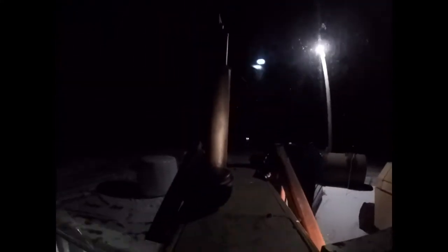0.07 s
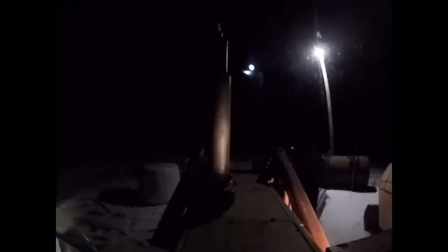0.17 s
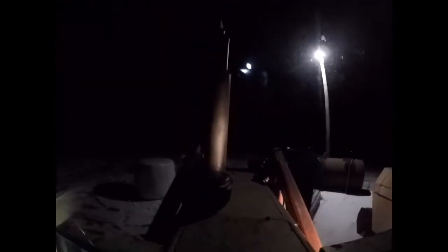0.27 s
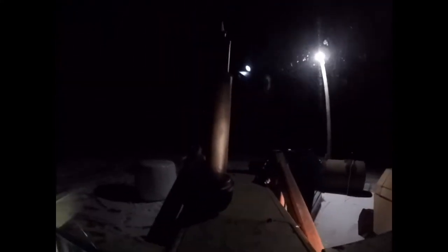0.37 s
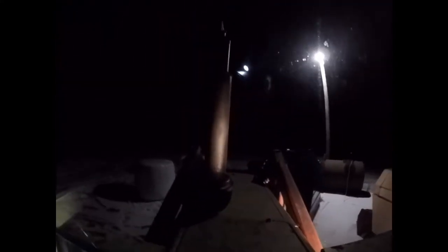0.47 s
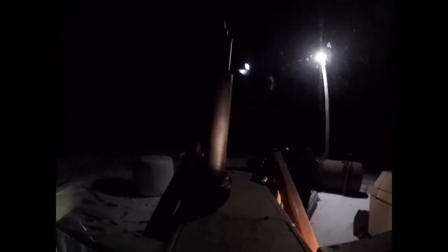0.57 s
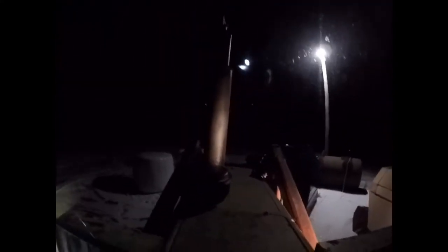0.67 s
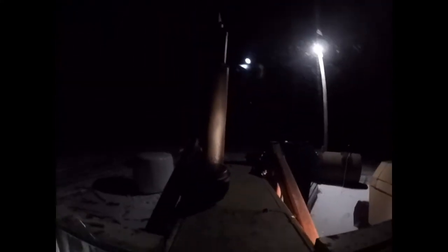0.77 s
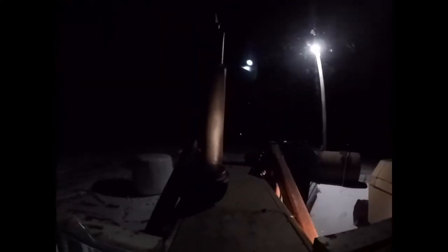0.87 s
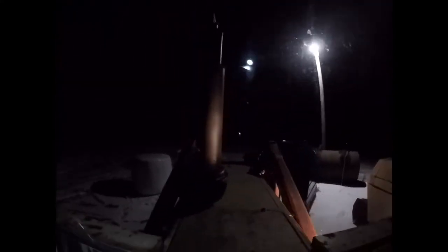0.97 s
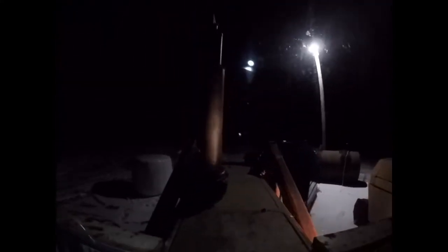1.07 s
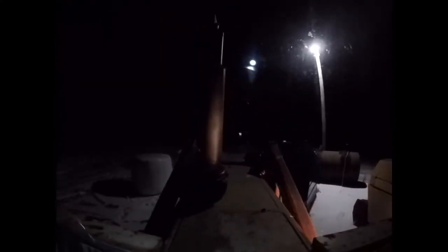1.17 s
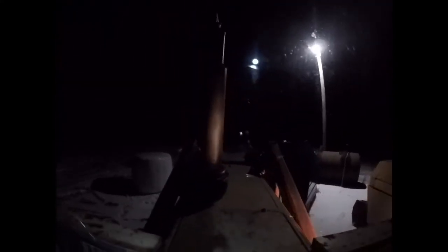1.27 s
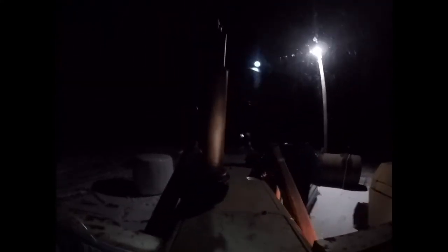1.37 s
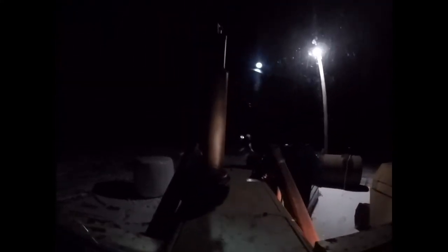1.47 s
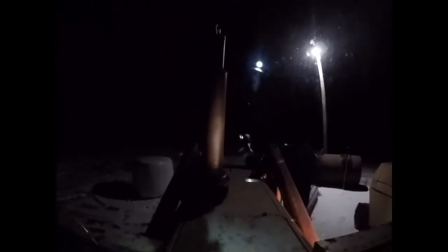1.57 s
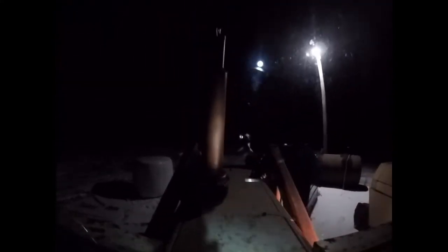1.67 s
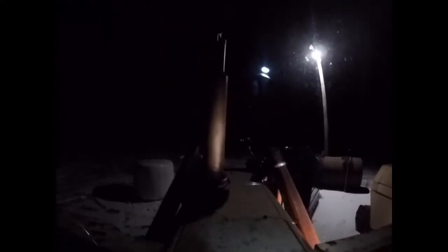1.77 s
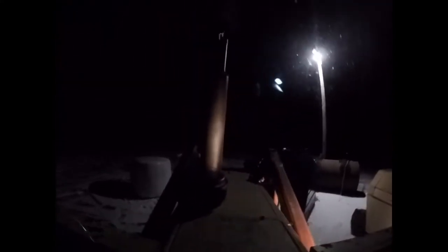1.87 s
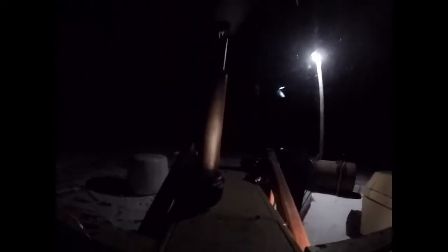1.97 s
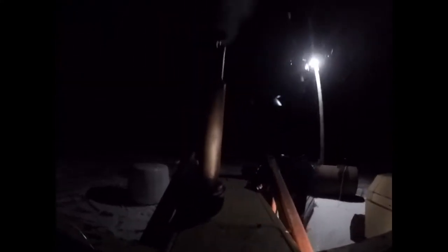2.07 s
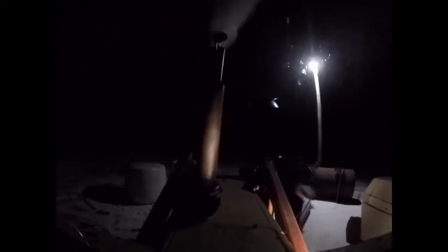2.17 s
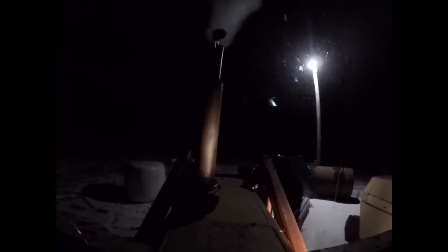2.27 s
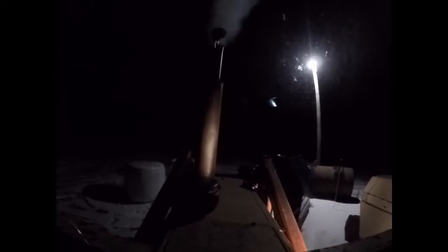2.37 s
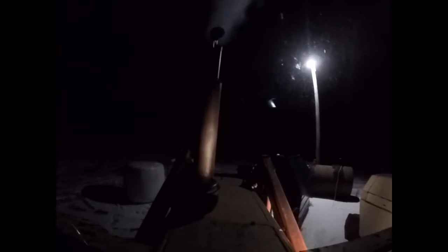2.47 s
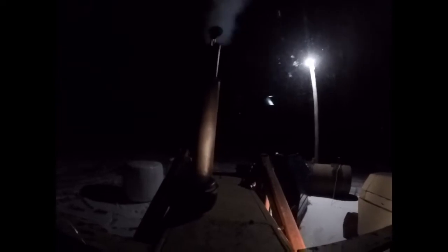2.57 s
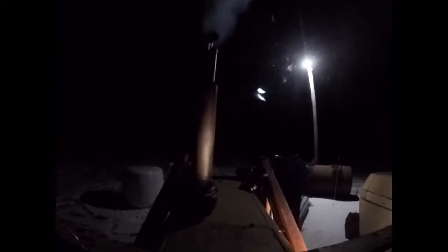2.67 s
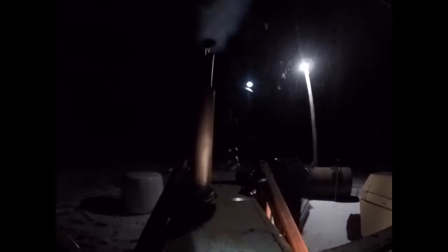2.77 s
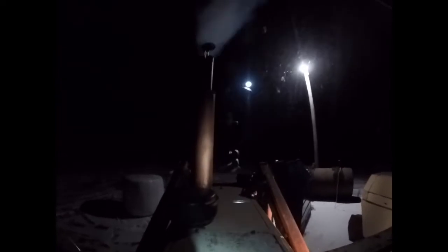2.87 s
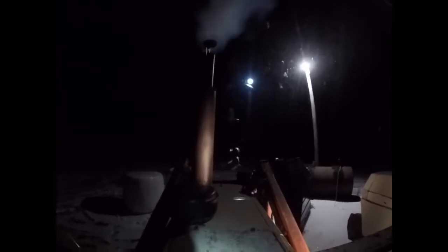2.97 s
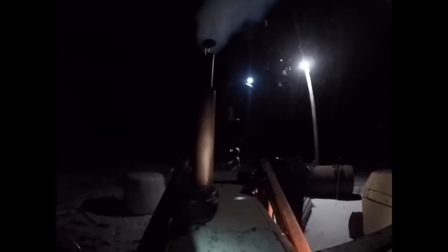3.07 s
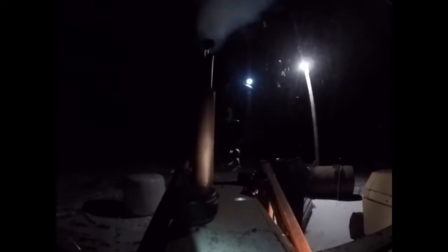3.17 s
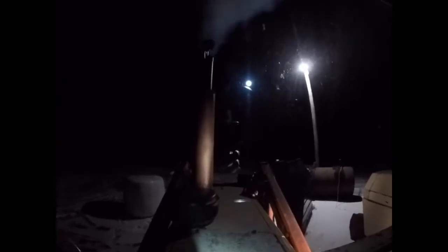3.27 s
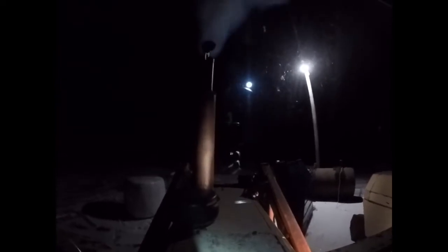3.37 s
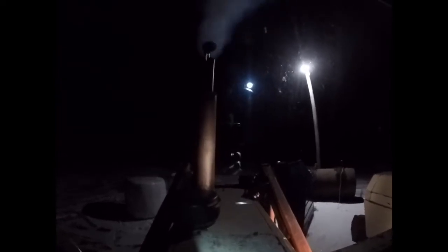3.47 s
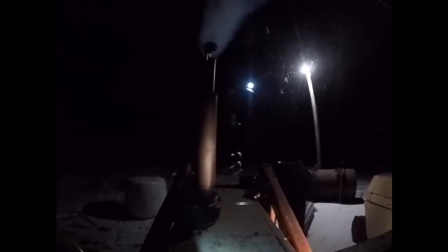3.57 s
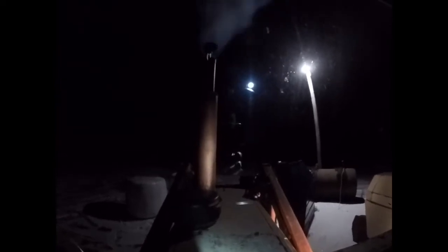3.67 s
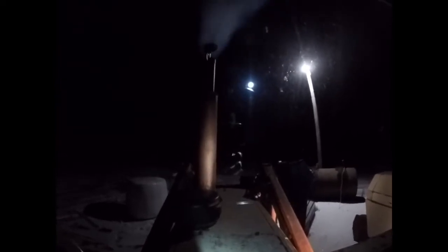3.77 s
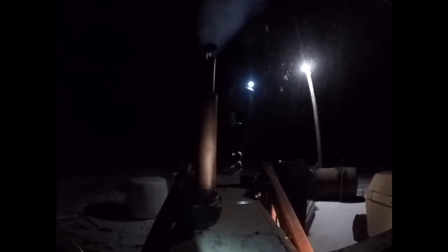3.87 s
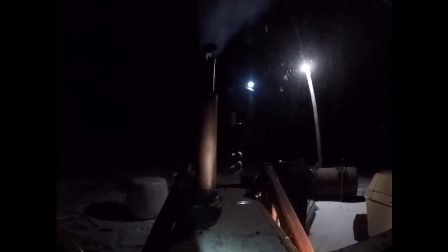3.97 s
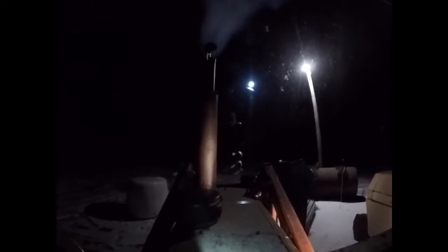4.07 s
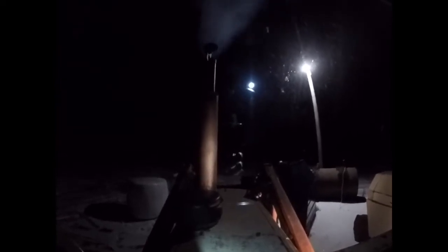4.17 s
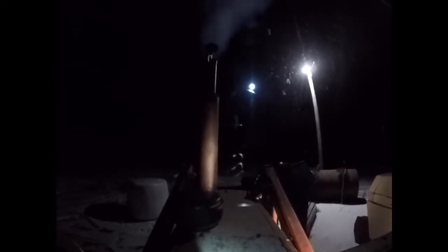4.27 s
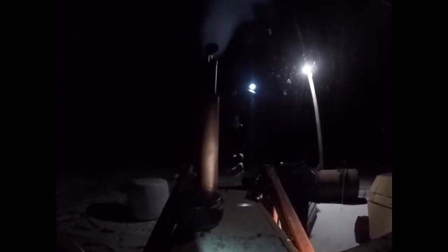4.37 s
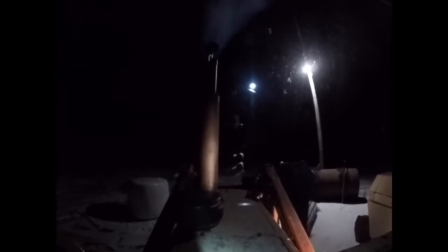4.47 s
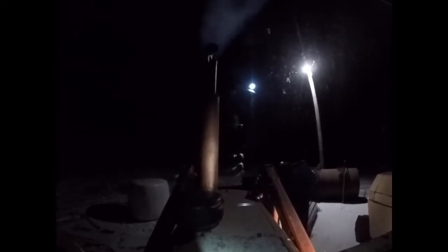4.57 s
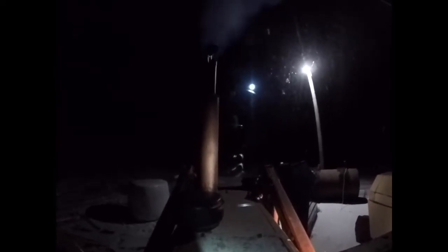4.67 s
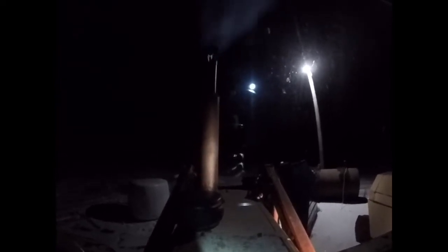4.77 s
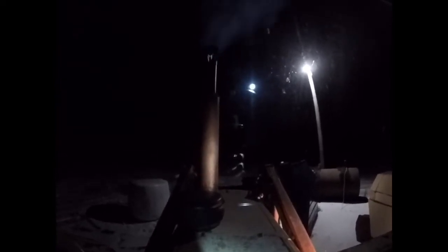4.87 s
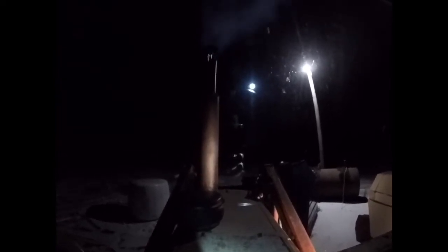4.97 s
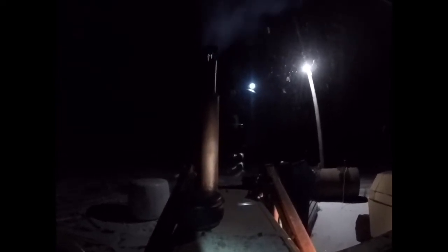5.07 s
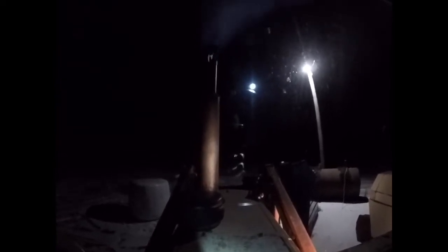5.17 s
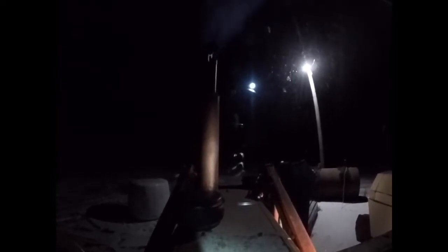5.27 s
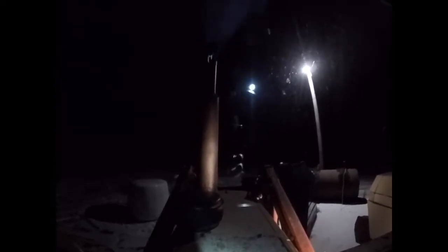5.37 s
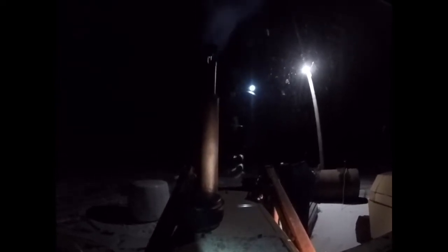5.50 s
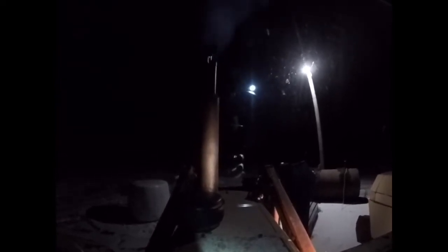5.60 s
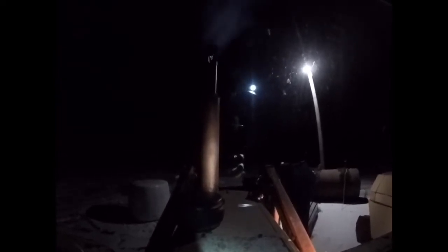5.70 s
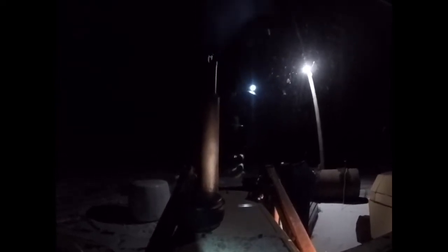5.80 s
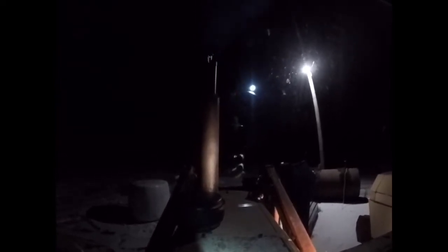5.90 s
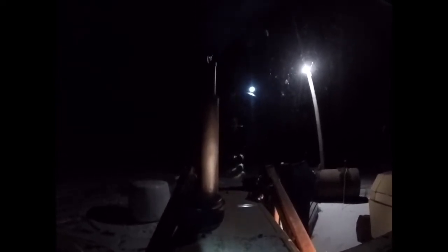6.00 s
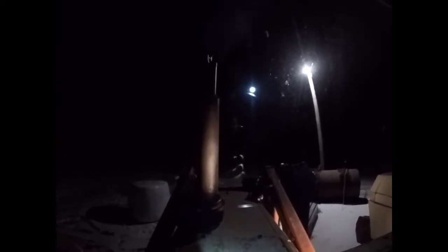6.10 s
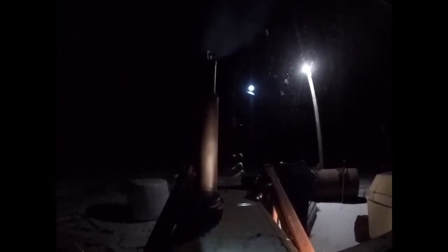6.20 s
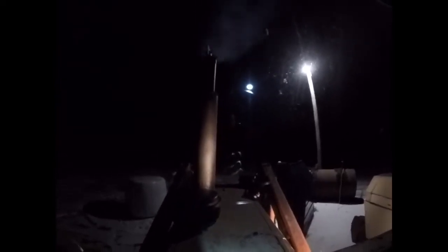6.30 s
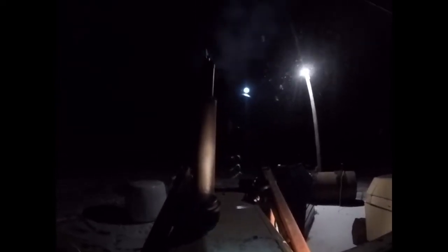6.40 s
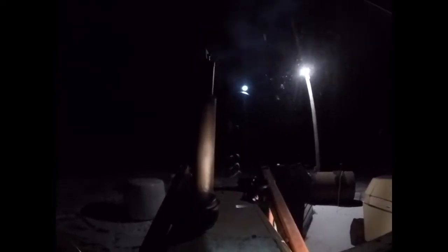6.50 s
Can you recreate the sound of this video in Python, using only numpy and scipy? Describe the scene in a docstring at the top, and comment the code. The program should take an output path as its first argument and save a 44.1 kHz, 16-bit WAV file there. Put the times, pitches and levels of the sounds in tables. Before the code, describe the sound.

Close microphone at the tractor seat in still open air. Faint handling thuds give way to a gritty starter whir and gear scrape under half a second long. The cold engine fires at once, loud and clattery, then settles into steady hard diesel knock, throaty stack roar, valve hiss and a thin turbo whistle. In the last half second pitch and loudness drop.

```python
"""Outdoors at night, from the driver's seat: a cold six-cylinder diesel tractor is started.
Fumbling at the controls: short filtered-noise bumps. Starter: swept gear partials, hum, grinding and rasps.
The engine catches at once and runs up to a fast idle: noise blows timed by the crankshaft ring stack and block.
Engine-order tones drone below, with gear mesh and a turbo whistle; near the end the throttle is eased."""
import sys
import numpy as np
from scipy import signal
from scipy.fft import rfft, irfft
from scipy.io import wavfile

SR = 44100
rng = np.random.default_rng(int(sys.argv[2]) if len(sys.argv) > 2 else 0)


def digitize_waveform(pressure):
    """Quantize a signal to 16-bit integers and store it at the path in sys.argv[1].

    Rows of a 2-D input are taken as channels; values are limited to [-1, 1].
    """
    field = np.atleast_2d(pressure).T
    bounded = np.clip(field, -1, 1)
    quanta = np.round(bounded * 32767).astype(np.int16)
    wavfile.write(sys.argv[1], SR, quanta)


N = 288414
TIME = np.arange(N) / SR  # [s]

# crankshaft speed: (time [s], speed [rev/min])
SPEED_RPM = [(1.2, 328.7), (1.6, 646.4), (1.9, 1073.5), (2.1, 1246.0), (2.45, 1333.3), (2.9, 1318.5),
             (3.1, 1338.2), (4.3, 1365.1), (5.93, 1367.7), (6.25, 1081.0), (6.54, 850.8)]
# fuel: full at the catch, governor cut, slow fall as the oil thins, hand easing; all scheduled
CATCH_S, CATCH_RISE_S = 1.348, 0.031
GOVERN_S, GOVERN_TAKES_S, GOVERN_DB = 1.64, 0.81, -2.5
THINNING_DB_PER_S = -0.43
EASE_S, EASE_TAKES_S, EASE_DB = 5.9, 0.15, -6
FUEL_SWELL_S, FUEL_SWELL_WIDTH_S, FUEL_SWELL_DB = 2.82, 0.12, 1.5
# the thin stack warms sooner than the block
STACK_WARM_S, STACK_WARM_TAKES_S = 2.52, 0.66
BLOCK_WARM_S, BLOCK_WARM_TAKES_S = 3.73, 1.27

# exhaust puffs: (time [s], level [dB])
EXHAUST_DB = [(1.33, -15), (1.68, -12.3), (2.0, -15), (3.0, -15.5), (3.4, -14.5), (4.2, -12.5), (5.0, -15),
              (6.2, -15), (6.54, -19)]
# exhaust stack colour: (frequency [Hz], relative level [dB])
STACK_COLOUR = [(15, -40), (30, -18.5), (55, -14), (95, -17), (125, -5.5), (200, -2.5), (255, -9),
                (330, -9.5), (400, -18), (600, -23.5), (1500, -49), (5000, -87)]
# stack resonances, cold: (centre [Hz], width [Hz], lift over colour [dB])
COLD_STACK_MODES = [(35, 63, 12), (141, 16, 8), (189, 78, -2.5), (281.4, 26, 7.5), (327, 23, 5)]
# stack resonances, warm: (centre [Hz], width [Hz], lift over colour [dB])
WARM_STACK_MODES = [(142.7, 12, 8.5), (177.6, 4.4, 12), (220, 37, 2), (292, 9.9, 2.2), (308, 87, 3.2)]

# cylinders in firing order: (combustion knock [relative dB], piston slap [relative dB])
CYLINDERS = [(2, 1.8), (1.6, 1.8), (1, .6), (1, -.2), (-2.1, -2.3), (-2.6, -2.3)]
# engine block colour: (frequency [Hz], relative level [dB])
BLOCK_COLOUR = [(150, -19), (300, -12), (450, 2), (700, -0.5), (1000, -3.5), (1300, -0.5), (1550, -7),
                (2000, -15), (2700, -20.5), (3500, -43), (6000, -38), (9000, -49.5), (15000, -76.5)]
# block resonances, cold: (centre [Hz], width [Hz], lift over colour [dB])
COLD_BLOCK_MODES = [(280, 25, 5.6), (575.5, 28, 17.1), (683, 42, 5.9), (801.6, 12, 12.5), (895, 167, 10.8),
                    (958, 53, 6.6), (1137, 136, 10.7), (1410, 430, 0.59), (1900, 450, 4.9)]
# block resonances, warm: (centre [Hz], width [Hz], lift over colour [dB])
WARM_BLOCK_MODES = [(550, 70, 12.9), (726, 15, 15), (803, 52, 11.2), (866, 49, 21.3), (1120, 27, 5.3),
                    (1738, 87, 11.6)]
KNOCK_DB, KNOCK_DB_PER_FUEL_DB = -15.5, 0.84
KNOCK_BRIGHT_HZ, KNOCK_BRIGHT_DB_PER_FUEL_DB = 1600, 0.61  # more fuel hardens the knock
COLD_SHARE_START, COLD_SHARE_END = 0.75, 0.34  # share of the cold ring
LOPE_DB, LOPE_PHASE_CYCLES = 0.75, 0.13  # cold surge once a cycle

# resonances swept by the firing tone: (centre [Hz], width [Hz], level at full fuel [dB])
BOOMS = [(29.8, 12, -17), (48.3, 8.6, -11.5)]
# lines from unequal cylinders: (multiple of cycle rate, level at top speed before cold rocking [dB])
UNEVEN_ORDERS = [(2, -32), (3, -34), (4, -30), (5, -33), (6, -35), (7, -34), (8, -26), (10, -26), (11, -30),
                 (13, -28), (16, -28), (18, -30), (21, -37), (25, -35), (26, -33), (29, -31), (31, -34)]
COLD_ROCKING_DB = 10  # divided by the multiple of the cycle rate
# stack drone at the octave of the firing tone
DRONE_HZ, DRONE_WIDTH_HZ, DRONE_COLD_DB, DRONE_WARM_GAIN_DB = 131.2, 22, -17, 8
DRONE_DB_PER_FUEL_DB = 0.49

# valve, injector and rasp hiss colour: (frequency [Hz], relative level [dB])
HISS_COLOUR = [(600, -19.5), (1800, 8), (3000, 1), (3900, 1.5), (5000, -1.5), (6200, -1), (7500, -14.5),
               (8600, -13.5), (10000, -23), (11500, -36), (13200, -21), (15000, -35)]
HISS_DB, HISS_DB_PER_FUEL_DB = -36.5, 0.47
START_RUSH_DB = 3  # extra hiss, fading out over the governor cut
HISS_COAST_DB_PER_S = -1.5  # from the easing on

# timing gear: teeth per crankshaft revolution; block resonance it excites
GEAR_TEETH = 38
GEAR_HZ, GEAR_WIDTH_HZ, GEAR_COLD_DB, GEAR_WARM_GAIN_DB = 872, 50, -40, 14.5

# turbocharger: pitch is at top speed, at TURBO_S
TURBO_S, TURBO_RISE_S, TURBO_DB, TURBO_DB_PER_FUEL_DB = 4.3, .4, -52, 0.46
TURBO_HZ, TURBO_CREEP_HZ_PER_S, TURBO_SPEED_POWER = 5470, 190, .7

STARTER_ON_S, STARTER_OFF_S, STARTER_RISE_S, STARTER_FALL_S = .875, 1.158, 0.05, 0.08
WHINE_DB, HUM_DB, HUM_HZ, HUM_SAG_HZ_PER_S = -25, -25.5, 87.5, -42
# whine is loudest as compression slows the motor
WHINE_LOAD_S, WHINE_LOAD_WIDTH_S, WHINE_LOAD_DB = 1.138, 0.058, 5.5
# tooth rate under compression; extra rate in the spurt between two compressions
TOOTH_HZ, SPURT_HZ, SPURT_S, SPURT_WIDTH_S = 278.4, 67.04, 1.073, 0.048
# starter gear whine partials: (multiple of tooth rate, relative level [dB])
WHINE_ORDERS = [(1, -4), (2, -2), (3, 0), (4, -11), (5, -10), (6, -13), (7, -16), (8, -20), (9, -18),
                (10, -24)]
# pinion slides in, bites, cranks, grinds twice on its way out:
# (start [s], length before decay [s], shudder [dB], grinding [dB], rasp [dB])
GRINDS = [(0.833, 0.047, -50, -32.5, -41), (0.868, 0.019, -16.5, -23, -36), (0.906, 0.032, -14, -43, -49),
          (0.959, 0.21, -23.5, -26, -47), (1.214, 0.041, -19, -20, -38), (1.294, 0.034, -21.5, -23.5, -39)]
GRIND_RISE_S, GRIND_T60_S = 0.025, 0.3
# pinion grinding colour: (frequency [Hz], relative level [dB])
GRIND_COLOUR = [(200, -18), (450, -6), (600, -1.5), (750, -4), (900, 0), (1300, -5.5), (1600, -6.5),
                (2500, -13.5), (4000, -19), (8000, -36), (15000, -56)]
# gear-tooth rasps: (middle [s], level [dB], centre [Hz], width [Hz], spread in time [s])
RASPS = [(0.882, -40, 7300, 2930, 0.01), (0.878, -51, 12000, 1990, .008), (0.852, -47, 9800, 6000, 0.0092),
         (1.0, -36.5, 5860, 1600, 0.0092), (1.01, -30, 2470, 250, 0.015), (1.07, -37, 3150, 297, 0.03),
         (1.078, -38, 4340, 1780, 0.066), (1.145, -30, 6020, 1500, 0.011), (1.242, -32, 3200, 500, 0.012),
         (1.243, -34, 5660, 1900, 0.024), (1.247, -29, 1980, 500, 0.0097)]
# starter kick and first firings: (time [s], thump [dB], knock [dB], t60 [s])
JOLTS = [(.878, -13, -10.5, 0.14), (0.902, -9, -17, 0.27), (0.941, -14, -24, 0.13), (1.261, -7, -25, 0.1),
         (1.314, -11, -31, 0.15), (1.368, -29, -25, 0.12), (1.419, -7, -10, 0.1), (1.458, -18, -14, 0.11),
         (1.652, -5.5, -30, 0.2)]

# bumps and ticks at the controls: (time [s], level [dB], brightness [Hz], t60 [s])
TICKS = [(.0, -37, 490, 0.4), (.0, -30, 35.5, 0.76), (.044, -44.5, 1300, 0.17), (0.148, -43, 3500, 0.075),
         (.155, -37, 170, 0.25), (0.219, -30, 95, 0.18), (.254, -40.5, 1200, 0.085),
         (0.253, -28, 200, 0.088), (0.355, -42, 800, 0.13), (.356, -38, 220, 0.11), (.615, -35, 90, 0.089),
         (.685, -55, 6000, 0.25), (.72, -44, 600, 0.14), (.76, -56, 7950, 0.22)]
# still night air and handling rumble colour: (frequency [Hz], relative level [dB])
AIR_COLOUR = [(12, -23), (20, 7), (50, 5), (87, -4), (286, -7.5), (347, -14), (693, -20.5), (1390, -24.5),
              (5240, -36), (9110, -37), (12700, -45), (15000, -56.5)]
AIR_DB = -41.5
BAND_EDGE_HZ = 15100


def amp(db):
    """Decibels to gain."""
    return 10 ** (np.asarray(db) / 20)


def unit(x):
    """Scales to an rms of one."""
    return x / np.sqrt(np.mean(x ** 2) + 1e-20)


def curves(rows):
    """Each column of a table, joined by straight lines in time."""
    times_s, *columns = np.transpose(rows)
    return [np.interp(TIME, times_s, column) for column in columns]


def ramp(start_s, length_s):
    """Linear rise from zero at start_s to one, length_s later."""
    return np.clip((TIME - start_s) / length_s, 0, 1)


def bump(middle_s, width_s):
    """Gaussian swell that reaches one at middle_s."""
    return np.exp(-((TIME - middle_s) / width_s) ** 2 / 2)


def burst(start_s, t60_s):
    """Envelope with a fast rise at start_s, then exponential decay."""
    age_s = np.maximum(TIME - start_s, 0)
    return (1 - np.exp(-age_s / 0.0025)) * np.exp(-np.log(1000) * age_s / t60_s)


def add(mix, start_s, sound):
    """Mixes a sound in at start_s."""
    part = mix[max(0, round(start_s * SR)):][:len(sound)]
    part += sound[:len(part)]


def wander(hz):
    """Slow random curve of rms one, up to about hz."""
    f = np.fft.rfftfreq(N, 1 / SR)
    spectrum = rfft(rng.standard_normal(N))
    return unit(irfft(spectrum / (1 + (f / hz) ** 4), N))


def in_tune(hz, centre_hz, width_hz):
    """How strongly a tone excites a resonance: one at its centre."""
    return 1 / (1 + (2 * (hz - centre_hz) / width_hz) ** 2)


def colour(x, points, modes=(), size=16384):
    """Filters x through a body with a smooth colour and resonances; minimum phase, rms one."""
    hz = np.fft.rfftfreq(size, 1 / SR)
    point_hz, point_db = np.transpose(points)
    db = np.interp(np.log(hz + 1), np.log(point_hz), point_db)
    for centre_hz, width_hz, lift_db in modes:
        db = db + lift_db * in_tune(hz, centre_hz, width_hz)
    log_gain = np.r_[db, db[-2:0:-1]] * np.log(10) / 20
    # the Hilbert transform of the log gain gives the causal phase
    response = np.fft.ifft(np.exp(np.conj(signal.hilbert(log_gain)))).real[:size // 2]
    return unit(signal.oaconvolve(x, response)[:N])


def brighten(x, hz, db):
    """Raises or lowers the treble above hz by a curve of dB."""
    highpass = signal.butter(2, hz, "high", fs=SR, output="sos")
    return x + (amp(db) - 1) * signal.sosfiltfilt(highpass, x)


def blows(turn, levels_db, lag, decay, fresh, scatter_db, jitter_s, size=4096):
    """Evenly spaced blows over the cycle; each keeps its own rattle, partly renewed every time.
    lag and decay are fractions of a cycle, so a slow engine gives long blows."""
    count = len(levels_db)
    number = np.arange(int(turn[-1] * count))
    times_s = np.interp(number / count + lag, turn, TIME)
    periods_s = np.maximum(np.gradient(times_s), 1 / SR) * count
    own = rng.standard_normal((count, size))
    chance = rng.standard_normal((len(number), size + 2))
    fresh = np.clip(fresh, 0, 1)
    out = np.zeros(N)
    for k, time_s, period_s, z in zip(number, times_s, periods_s, chance):
        rattle = np.sqrt(1 - fresh) * own[k % count] + np.sqrt(fresh) * z[2:]
        dying = np.exp(-TIME[:size] / (decay * period_s))
        gain = amp(levels_db[k % count] + scatter_db * z[1])
        add(out, time_s + jitter_s * z[0], gain * dying * rattle)
    return out


def cycles():
    """Four-stroke cycles turned since the start of the speed table: two revolutions each."""
    cycle_hz = curves(SPEED_RPM)[0] / (2 * 60)
    return np.cumsum(cycle_hz * (TIME > SPEED_RPM[0][0])) / SR


def speed():
    """Crankshaft speed as a share of its top speed."""
    rpm = curves(SPEED_RPM)[0]
    return rpm / rpm.max()


def fuel():
    """Scheduled fuel per stroke, in dB relative to full."""
    governed_db = GOVERN_DB * ramp(GOVERN_S, GOVERN_TAKES_S)
    swell_db = FUEL_SWELL_DB * bump(FUEL_SWELL_S, FUEL_SWELL_WIDTH_S)
    thinning_db = THINNING_DB_PER_S * np.maximum(TIME - GOVERN_S, 0)
    return governed_db + swell_db + thinning_db + EASE_DB * ramp(EASE_S, EASE_TAKES_S)


def stack_warmth():
    """Stack state: zero cold, one warm."""
    return ramp(STACK_WARM_S, STACK_WARM_TAKES_S)


def block_warmth():
    """Block state: zero cold, one warm."""
    return ramp(BLOCK_WARM_S, BLOCK_WARM_TAKES_S)


def engine():
    """All the running parts, locked to the crankshaft, fading in as the cylinders catch."""
    turn, fuel_db = cycles(), fuel()
    fired = drone(turn, fuel_db) + exhaust(turn) + knock(turn, fuel_db) + valve_gear(turn, fuel_db)
    return ramp(CATCH_S, CATCH_RISE_S) * (fired + timing_gear(turn) + turbo(fuel_db))


def knock(turn, fuel_db):
    """Combustion and piston slap ring the block; as it warms, the ring shifts and firing evens out."""
    hits = blows(turn, np.ravel(CYLINDERS), lag=-.035, decay=.105, fresh=.3, scatter_db=.7, jitter_s=.00005)
    warm = block_warmth()
    cold_share = np.clip(COLD_SHARE_START + (COLD_SHARE_END - COLD_SHARE_START) * warm, 0, 1)
    cold_ring = colour(hits, BLOCK_COLOUR, COLD_BLOCK_MODES)
    warm_ring = colour(hits, BLOCK_COLOUR, WARM_BLOCK_MODES)
    ring = cold_share * cold_ring + (1 - cold_share) * warm_ring
    lope_db = LOPE_DB * (1 - warm) * np.cos(2 * np.pi * (turn - LOPE_PHASE_CYCLES))
    treble_db = KNOCK_BRIGHT_DB_PER_FUEL_DB * (fuel_db - np.median(fuel_db))
    level_db = KNOCK_DB + KNOCK_DB_PER_FUEL_DB * fuel_db + lope_db
    return amp(level_db) * brighten(ring, KNOCK_BRIGHT_HZ, treble_db)


def exhaust(turn):
    """Ragged puffs ring the stack, whose resonances shift as it warms."""
    puffs = blows(turn, np.zeros(len(CYLINDERS)), lag=0.0308, decay=0.11, fresh=0.88,
                  scatter_db=0.1, jitter_s=0.00034)
    warm = stack_warmth()
    cold_roar = colour(puffs, STACK_COLOUR, COLD_STACK_MODES)
    warm_roar = colour(puffs, STACK_COLOUR, WARM_STACK_MODES)
    return amp(curves(EXHAUST_DB)[0]) * ((1 - warm) * cold_roar + warm * warm_roar)


def drone(turn, fuel_db):
    """Clean engine orders: the firing tone and its octave swell at resonances, over uneven-cylinder lines."""
    firings = len(CYLINDERS) * turn
    firing_hz = np.gradient(firings) * SR
    boom = sum(amp(db + fuel_db) * in_tune(firing_hz, centre, width) for centre, width, db in BOOMS)
    octave_db = DRONE_COLD_DB + DRONE_DB_PER_FUEL_DB * fuel_db + DRONE_WARM_GAIN_DB * block_warmth()
    octave_db = octave_db + .6 * wander(2.5)
    octave = amp(octave_db) * in_tune(2 * firing_hz, DRONE_HZ, DRONE_WIDTH_HZ)
    rocking_db = COLD_ROCKING_DB * (1 - stack_warmth())
    lines = np.zeros(N)
    for order, db in UNEVEN_ORDERS:
        line_db = db + rocking_db / order + 0.97 * wander(3.1)
        lines += amp(line_db) * np.sin(2 * np.pi * (order * turn + rng.random()))
    shaking = speed() ** 2.8  # shaking forces grow with speed
    tones = boom * np.sin(2 * np.pi * firings) + octave * np.sin(2 * np.pi * 2 * firings)
    return np.sqrt(2) * (tones + shaking * lines)


def valve_gear(turn, fuel_db):
    """Valves and injectors tick over a rush that swells each revolution; eased, it also pulses each cycle."""
    eased = ramp(EASE_S, EASE_TAKES_S)
    hiss_db = HISS_DB + HISS_DB_PER_FUEL_DB * fuel_db
    hiss_db = hiss_db + START_RUSH_DB * (1 - ramp(GOVERN_S, GOVERN_TAKES_S))
    hiss_db = hiss_db + HISS_COAST_DB_PER_S * np.maximum(TIME - EASE_S, 0)
    ticks = blows(turn, np.zeros(2 * len(CYLINDERS)), lag=.05, decay=0.092, fresh=0.82,
                  scatter_db=1.0, jitter_s=0.00045)
    # ticks stand out more once eased
    rush = (2.1 - 0.27 * eased) * rng.standard_normal(N)
    hiss = colour((1 + .4 * eased) * unit(ticks) + rush, HISS_COLOUR)
    bright = brighten(hiss, 7000, 1.2 * (hiss_db - np.median(hiss_db)))
    revolution_db = 0.4 * np.cos(2 * np.pi * 2 * (turn - .26))
    cycle_db = 0.71 * eased * np.cos(2 * np.pi * (turn - .2))
    return amp(hiss_db + revolution_db + cycle_db + 0.88 * wander(32)) * bright


def timing_gear(turn):
    """Gear teeth on the crankshaft mesh harder once a cycle, and sing near the block's resonance."""
    teeth = 2 * GEAR_TEETH * turn
    load = 1 + 0.6 * np.cos(2 * np.pi * (turn - .25))
    tone = np.sin(2 * np.pi * teeth + 0.15 * wander(25))
    mesh = tone * in_tune(np.gradient(teeth) * SR, GEAR_HZ, GEAR_WIDTH_HZ)
    level_db = GEAR_COLD_DB + GEAR_WARM_GAIN_DB * block_warmth() + 1.2 * wander(45)
    return amp(level_db) * load * mesh


def turbo(fuel_db):
    """Thin, wavering whistle: pitch follows speed by a power law, level follows fuel."""
    hz = (TURBO_HZ + TURBO_CREEP_HZ_PER_S * (TIME - TURBO_S)) * speed() ** TURBO_SPEED_POWER
    whistle = np.sqrt(2) * np.sin(2 * np.pi * np.cumsum(hz * (1 + .007 * wander(90))) / SR)
    level_db = TURBO_DB + TURBO_DB_PER_FUEL_DB * fuel_db + 2.5 * wander(11)
    return ramp(TURBO_S, TURBO_RISE_S) * amp(level_db) * whistle


def starter():
    """The motor hums and its gear whines, spurting ahead between two compressions; the pinion grinds."""
    tooth_hz = TOOTH_HZ + SPURT_HZ * bump(SPURT_S, SPURT_WIDTH_S)
    teeth = np.cumsum(tooth_hz * (1 + .02 * wander(70))) / SR
    partials = np.zeros(N)
    for order, db in WHINE_ORDERS:
        partials += amp(db + 3 * wander(45)) * np.sin(2 * np.pi * (order * teeth + rng.random()))
    whine_db = WHINE_DB + WHINE_LOAD_DB * bump(WHINE_LOAD_S, WHINE_LOAD_WIDTH_S)
    hum_hz = HUM_HZ + HUM_SAG_HZ_PER_S * (TIME - STARTER_ON_S)
    hum = np.sqrt(2) * np.sin(2 * np.pi * np.cumsum(hum_hz) / SR)
    running = ramp(STARTER_ON_S, STARTER_RISE_S) * (1 - ramp(STARTER_OFF_S, STARTER_FALL_S))
    return running * (amp(whine_db) * unit(partials) + amp(HUM_DB) * hum) + grinding(teeth)


def grinding(teeth):
    """Each grind of the pinion on the ring gear shakes the frame and scrapes, tooth by tooth."""
    tooth_pulse = 0.98 + np.exp(-(teeth % 1) / 0.5)
    scrape = rng.standard_normal(N) * tooth_pulse * amp(0.8 * wander(90))
    shudder = colour(scrape, [(60, -9.5), (120, -7.5), (170, 7.5), (215, -4.0), (290, 2.5),
                              (420, -28.5), (1200, -70)])
    grind = colour(scrape, GRIND_COLOUR)
    rasp = colour(scrape, HISS_COLOUR)
    out = np.zeros(N)
    for start_s, length_s, shudder_db, grind_db, rasp_db in GRINDS:
        after_s = np.maximum(TIME - start_s - length_s, 0)
        held = ramp(start_s, GRIND_RISE_S) * np.exp(-np.log(1000) * after_s / GRIND_T60_S)
        out += held * (amp(shudder_db) * shudder + amp(grind_db) * grind + amp(rasp_db) * rasp)
    return out


def rasps():
    """The teeth scrape in short bright noise bursts as the load changes."""
    out = np.zeros(N)
    for middle_s, db, hz, width_hz, spread_s in RASPS:
        body = [(hz / 4, -25), (hz, 0), (hz * 2, -30)]
        band = colour(rng.standard_normal(N), body, [(hz, width_hz, 14)])
        out += amp(db) * bump(middle_s, spread_s) * band
    return out


def jolts():
    """Single heavy blows shake the stack and the cold block."""
    thump = colour(rng.standard_normal(N), [(50, -27), (130, 8.5), (200, -6.0), (300, 5),
                                            (420, -12), (1200, -69)])
    clank = colour(rng.standard_normal(N), BLOCK_COLOUR, COLD_BLOCK_MODES)
    out = np.zeros(N)
    for start_s, thump_db, knock_db, t60_s in JOLTS:
        out += burst(start_s, t60_s) * (amp(thump_db) * thump + amp(knock_db) * clank)
    return out


def cab():
    """Steady air and handling rumble; decaying noise bumps and ticks at the controls."""
    out = amp(AIR_DB) * colour(rng.standard_normal(N), AIR_COLOUR)
    for start_s, db, hz, t60_s in TICKS:
        body = [(hz / 5, -14), (hz, 0), (hz * 1.4, -4), (hz * 2.2, -18), (hz * 16, -70)]
        out += amp(db) * burst(start_s, t60_s) * colour(rng.standard_normal(N), body)
    return out


def scene():
    """The tractor, heard from one point: one channel."""
    return (engine() + starter() + rasps() + jolts() + cab())[None]


def record(dry):
    """The microphone rounds off the highest peaks; then the band limit."""
    ceiling = .95
    rounded = dry / (1 + (dry / ceiling) ** 6) ** (1 / 6)
    lowpass = signal.firwin(511, BAND_EDGE_HZ, window=("kaiser", 9), fs=SR)
    return signal.oaconvolve(rounded, lowpass[None], "same")


dry = scene()
out = record(dry)
digitize_waveform(out)
```